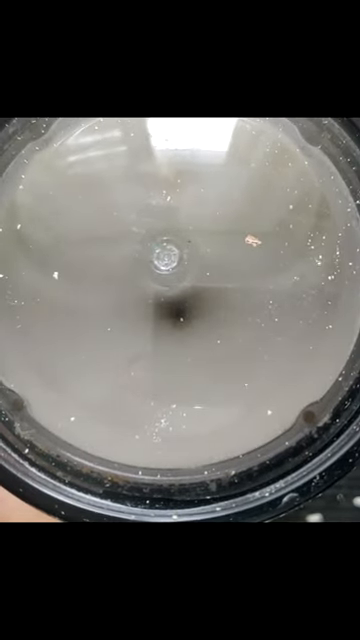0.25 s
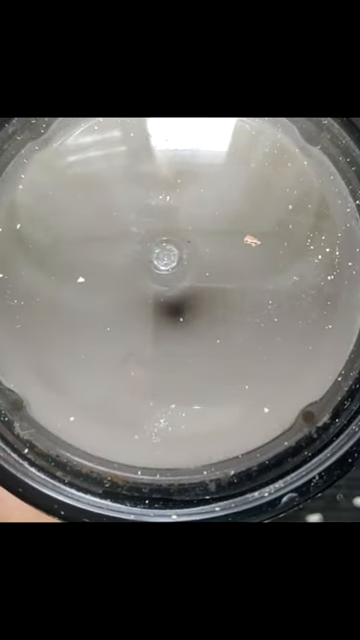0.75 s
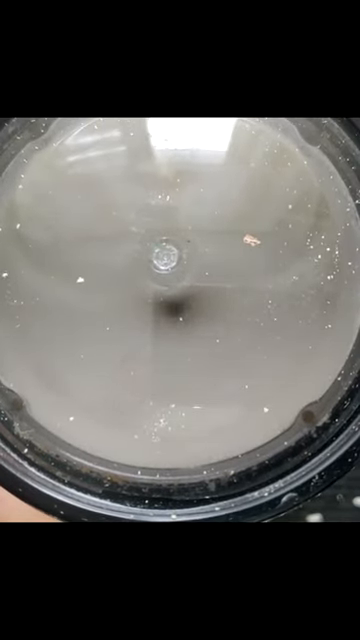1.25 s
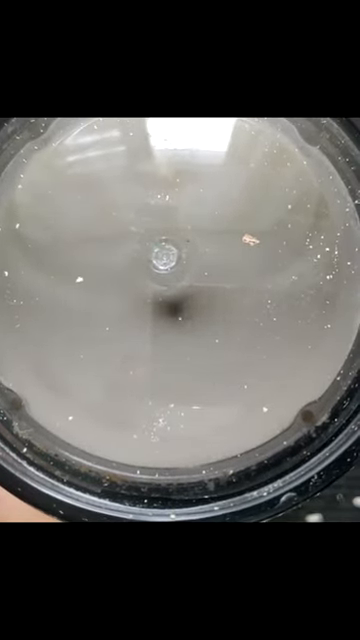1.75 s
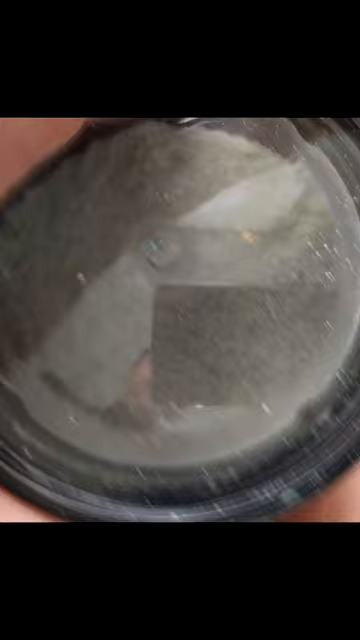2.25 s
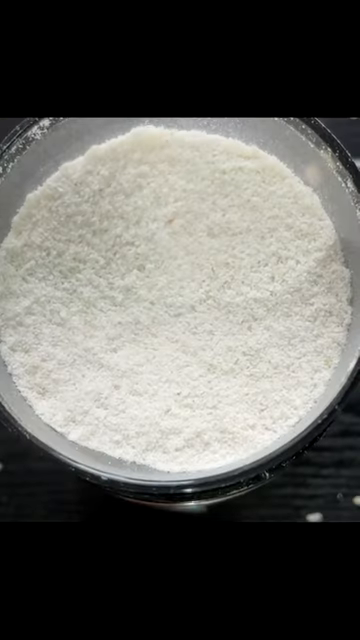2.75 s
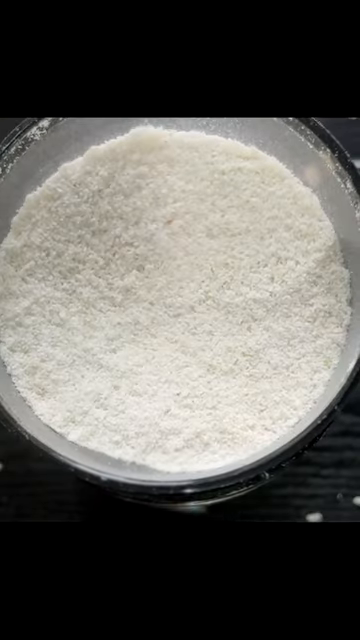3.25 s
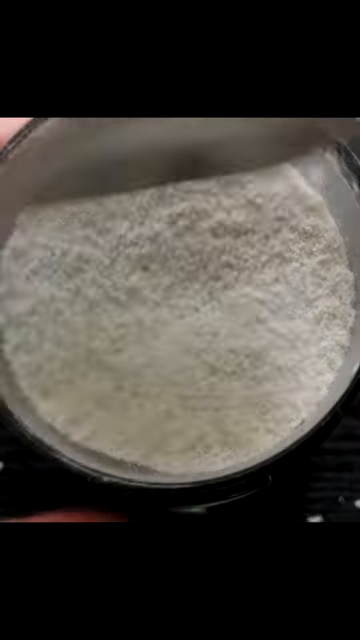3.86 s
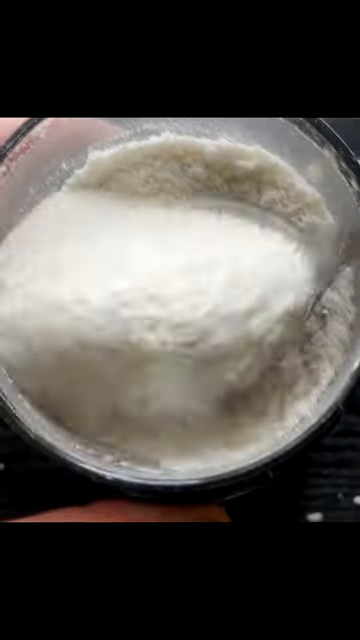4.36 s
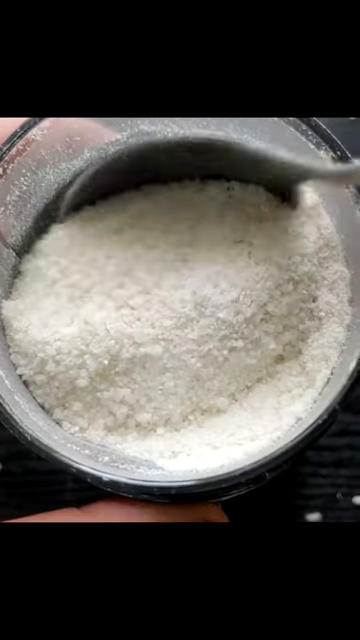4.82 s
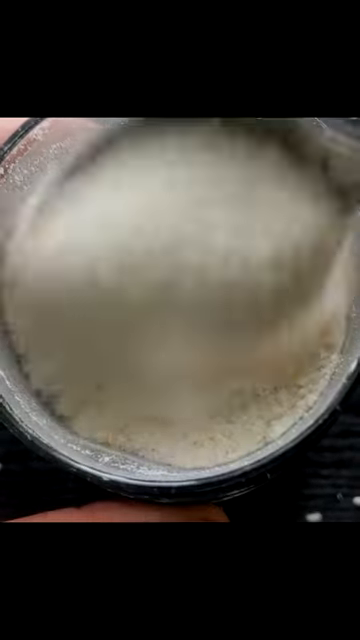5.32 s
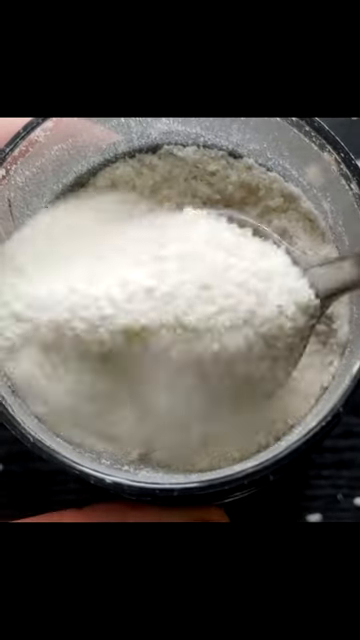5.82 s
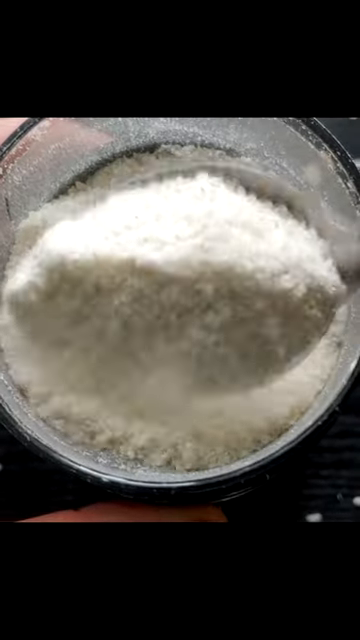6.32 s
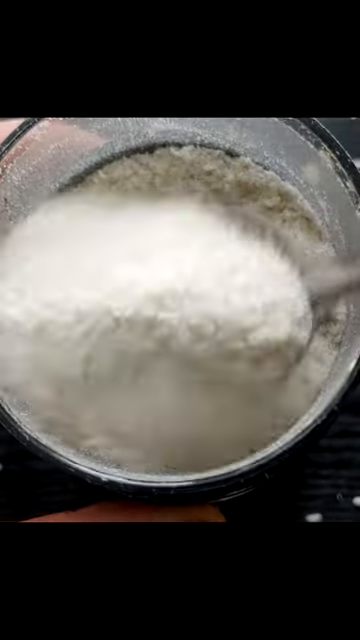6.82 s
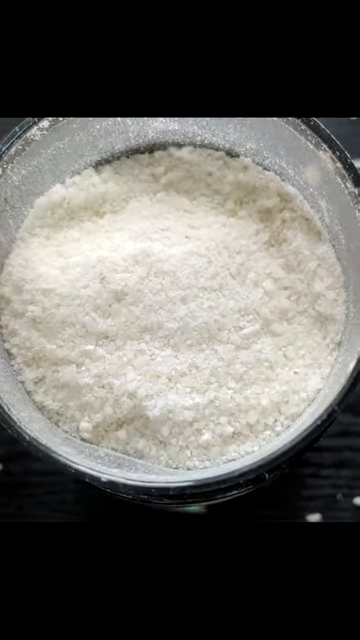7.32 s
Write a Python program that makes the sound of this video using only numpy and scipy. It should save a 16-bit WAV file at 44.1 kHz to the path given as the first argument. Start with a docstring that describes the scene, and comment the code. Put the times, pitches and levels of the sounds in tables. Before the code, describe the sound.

Close, harsh grinding of dry grain cuts out quickly, followed by plastic lid clicks, a counter bump and light spoon taps in powder.

```python
"""A small blade grinder whirls dry grain close by, then runs down after two seconds: shaft harmonics
over noise from dense grain impacts. Its plastic lid snaps off, lands and wobbles on the counter, and the
grinder is bumped down: short noise blows with decaying modes. A spoon taps, digs and scrapes in the flour:
blows and clumped slips through the cup's resonances. Fingers rub; behind is still room air and faint hum."""
import sys
import numpy as np
from scipy import signal
from scipy.fft import rfft, irfft
from scipy.io import wavfile

SR = 44100
rng = np.random.default_rng(int(sys.argv[2]) if len(sys.argv) > 2 else 0)


def put_to_file(sound):
    """Save the sound as 16-bit audio at rate SR, in the file named by the first command-line argument."""
    columns = np.atleast_2d(sound).T  # one column per channel
    safe = np.clip(columns, -1, 1)
    whole_steps = np.round(safe * 32767)
    wavfile.write(sys.argv[1], SR, whole_steps.astype(np.int16))


N = 334278
T = np.arange(N) / SR

# Room air spectrum, relative: freq_hz, density_db_per_hz
ROOM_SPECTRUM = [(15, -28.5), (48, -8), (80, -12), (115, -8.5), (160, -21), (205, -14), (300, -21.5),
                 (400, -24), (560, -17), (740, -24.5), (900, -21.5), (1130, -31.5), (1400, -26.5),
                 (2100, -43), (2600, -38.5), (4000, -48.5), (7500, -59.5), (9800, -48), (12500, -61.5),
                 (15000, -64)]
# Hum tones: freq_hz, level_db
HUM_TONES = [(120, -72.5), (202, -85)]
AIR_DB = -70
EDGE_HZ = 15800

# Shaft speed under load, before run-down: time_s, speed_turns_per_s
SHAFT_SPEED = [(0.0, 252.6), (0.12, 250.7), (0.2, 254.4), (0.3, 244.2), (0.34, 246.5), (0.44, 247.7),
               (0.49, 244.1), (0.59, 250.0), (0.64, 246.4), (0.83, 250.7), (0.94, 245.7), (1.1, 248.5),
               (1.32, 248.8), (1.37, 246.1), (1.48, 248.1), (1.83, 247.6), (1.88, 244.5), (2.04, 244.8)]
# Shaft harmonics 1, 2, 3.., before load and coarseness: level_db, pan_left_right_db, flutter_0_1
SHAFT_HARMONICS = [(-37.5, -11.5, 0.18), (-31, 1, 0.2), (-40.5, 2, 0.45), (-38.5, 9.5, 0.5),
                   (-27.5, 3.5, 0.4), (-42.5, 5.5, 0.2)]
# Grain on the cup wall, relative: freq_hz, density_db_per_hz
WALL_SPECTRUM = [(20, -38), (55, -26.5), (105, -17), (155, -27.5), (275, -10.5), (360, -5.5), (520, -6),
                 (880, -7.5), (1060, -7.5), (1380, 1), (1620, -3.5), (2050, -3.5), (2550, -9), (3350, -25),
                 (3950, -26), (4550, -38), (7000, -85.5)]
# Treble of the grain spray, relative: freq_hz, density_db_per_hz
SPRAY_SPECTRUM = [(3500, -30), (4600, -8), (5600, -8), (6300, -5), (6900, -11), (7350, -25), (7850, -9),
                  (8700, -4), (9600, 2), (10400, 0), (11900, -9), (12650, -24), (13300, -13), (15800, -13)]
# Cup and housing modes: freq_hz, width_hz, level_db
HOUSING_MODES = [(592.7, 23, -42.5), (658, 60, -42), (728, 72, -48), (868.5, 57, -42), (1301, 60, -44),
                 (1430, 74, -40.5), (1446.5, 17, -45), (1627, 35, -60), (1717, 12, -53.5), (1963, 43, -46),
                 (2112, 40, -42.5), (2175, 45, -44.5), (2537, 66, -45), (2680, 63, -60.5), (2860, 57, -56),
                 (2920, 60, -62), (3780, 210, -49.5), (5460, 430, -66.5), (6280, 410, -70)]
# Grinding balance: freq_hz, pan_left_right_db
GRINDING_PAN = [(60, -1), (200, -2), (400, 3.5), (900, 5), (1400, 0.5), (2400, 9.5), (3200, 4), (3900, -5),
                (5400, 1), (6300, 5), (8000, 0), (15000, -2)]
# Grinding likeness of left and right: freq_hz, likeness_0_1
GRINDING_LIKENESS = [(100, .85), (600, .75), (1400, .7), (2300, .3), (3200, 0), (15000, 0)]
# The power is cut; the settling flour brakes the blade ever harder
OFF_S, RUN_DOWN_S, BRAKING_POWER = 2.0348, 0.157, 3.36
GRIND_POWER, TONE_POWER = 7, 36  # gain exponents on the speed share
COARSE_DB, COARSE_S = -7, 0.33  # tone starts weak, rises as the grain gets finer; time constant
TONE_DB_PER_TURN_PER_S = 0.51  # tone weakens when load drags the speed down

# Lid catches let go: start_s, level_db, tilt_db_per_octave, rattle_t60_s, pan_left_right_db
CATCH_CLICKS = [(2.356, -53, -2, 0.06, 3), (2.366, -47.5, 0.5, 0.08, 13), (2.3803, -27, 1, 0.014, 10),
                (2.392, -39, -0.5, 0.073, 2), (2.446, -48.5, -9, 0.19, 2), (2.478, -62, 3.5, 0.032, -1)]
# Catch colour, relative: freq_hz, density_db_per_hz
CATCH_SPECTRUM = [(60, -39), (120, -8), (550, 7), (900, 1), (1250, 0), (1500, 6.5), (2050, 2), (2400, -13),
                  (2700, -4), (3200, -23), (3800, -16.5), (5800, -25), (8000, -22), (11000, -31),
                  (15000, -58)]
# Lid edges land on the counter: start_s, level_db, bounce_gap_s, rattle_t60_s
LANDINGS = [(2.7067, -26.5, .0095, 0.09), (2.837, -34.5, .014, 0.077)]
LID_TOUCH_DB, BOUNCE_LOSS_DB = -10, 4  # graze before landing; loss per bounce
# Lid colour, relative: freq_hz, density_db_per_hz
LID_SPECTRUM = [(47, -54), (80, -16.5), (333, -4), (394, -5), (465, -10), (624, -3.5), (892, -8.5),
                (970, 5.5), (1050, -15.5), (1270, -11), (1380, -22.5), (2650, -40), (4570, -60.5),
                (12000, -73), (15600, -103), (22000, -120)]
# Lid ring after each blow: freq_hz, level_re_blow_db, t60_s
LID_RING_MODES = [(970, -26, .15), (2650, -31, 0.096)]
# Lid rim rolls to rest: start_s, length_s, level_db, pitch_hz
RIM_WOBBLES = [(2.816, 0.077, -40.5, 918), (2.885, 0.047, -51.5, 280), (3.055, 0.053, -55.5, 243)]

# Grinder meets the counter: start_s, level_db, tilt_db_per_octave, rattle_t60_s, pan_left_right_db
COUNTER_BUMPS = [(3.5555, -41, 2.5, 0.08, -3.5), (3.5667, -22, 2.24, 0.0089, -8),
                 (3.5712, -33, -1.5, 0.015, -4), (3.579, -46, 1, .03, -1.5)]
# Counter colour, relative: freq_hz, density_db_per_hz
COUNTER_SPECTRUM = [(50, -11), (110, -4.5), (280, 4), (400, -6), (520, 2), (720, 3.5), (930, -13.5),
                    (1150, 0.5), (1500, -7), (2200, -9), (2900, -23), (5800, -38.5), (13000, -53),
                    (15000, -65)]
# Grinder base ring: freq_hz, level_re_blow_db, t60_s
BASE_RING_MODES = [(260, -5, 0.049), (529, -1, .045), (704, 0.5, .04), (1123, -5.5, 0.033),
                   (2670, -39.5, 0.12)]
# Hand or spoon leans on the grinder: start_s, level_db
LEANS = [(2.446, -51), (5.7, -49.5), (5.758, -52), (7.297, -54)]
BOUNCE_HZ, BOUNCE_T60_S, TILT_HZ, TILT_T60_S = 57, 0.22, 105, 0.11  # grinder on its rubber feet

# Cup's broad response, relative: freq_hz, density_db_per_hz
CUP_SPECTRUM = [(60, -3), (200, -8.5), (350, -3.5), (800, -4.5), (1100, -8.5), (1800, -11), (2250, -22),
                (3600, -34), (5200, -39.5), (7500, -49), (9700, -30), (12000, -53), (15000, -44)]
# Cup modes: freq_hz, width_hz, lift_db
CUP_RING_MODES = [(359, 26, 9), (653, 90, 8), (937, 24, 4.5), (1495, 98, 7), (3640, 67, 12.5),
                  (4400, 44, -13)]
# Spoon on cup: start_s, level_db, tilt_db_per_octave, rattle_t60_s, focus_hz, metal_ring_db
TAPS = [(3.29, -66, -1.5, 0.037, 600, -76), (3.933, -57, -1.5, 0.044, 1550, -65),
        (4.214, -64.5, -1.5, 0.055, 1550, -74), (4.348, -54.5, 1, 0.092, 830, -59),
        (4.645, -49.5, -8.5, 0.064, 380, -66), (4.712, -54, -0.5, 0.11, 910, -66),
        (4.734, -48.5, -2, 0.025, 1390, -70), (5.007, -52.5, -2, 0.094, 710, -70),
        (5.02, -50.5, 1, 0.12, 816, -63), (5.165, -58, -5, 0.1, 1450, -58),
        (5.522, -59, 0, 0.034, 363, -68), (5.6101, -41, -1, 0.013, 470, -48),
        (5.625, -47, -0.5, 0.11, 600, -57), (5.727, -55.5, -0.5, 0.064, 627, -66),
        (5.805, -58, 0.5, .08, 640, -74), (6.56, -57, -1.5, 0.042, 352, -69),
        (6.626, -57, -1.5, 0.028, 368, -70.5), (6.652, -50.5, -3.5, 0.048, 560, -61.5),
        (6.823, -56, -4, 0.085, 417, -67), (7.057, -61.5, -5.5, 0.097, 250, -76),
        (7.2891, -48, 0, 0.045, 343, -44)]
# Spoon metal: freq_hz, level_re_ring_db, t60_s
METAL_MODES = [(1495, -9, 0.078), (2350, -13.5, 0.025), (3530, -35, 0.075), (4430, -43, .1)]
HEAVY_TAP_DB = 1.2  # extra rocking per dB/octave of dullness: a dull touch is a heavy push
# Spoon scoops flour: start_s, length_s, dig_db, dig_tilt_db_per_octave, drag_db, lift_db
FLOUR_SCOOPS = [(4.123, .16, -69, 2.5, -80, -76), (4.637, .14, -60, 4, -65, -73),
                (4.999, 0.233, -56.5, -1, -58.5, -63.5), (5.598, 0.274, -51, 0.5, -67.5, -62.5),
                (6.641, 0.25, -60, -2.5, -68, -71)]
DIG_S, LIFT_S = 0.061, 0.071
DIG_HZ, DRAG_HZ, LIFT_HZ = 3080, 1400, 1150  # focus as the spoon moves round the cup
DRAG_TILT_DB_PER_OCTAVE, LIFT_TILT_DB_PER_OCTAVE = -1.5, 2.5
SING_HZ, SING_WIDTH_HZ = 4440, 52  # mode that scraping keeps sounding
# Fingers slide on lid and cup: start_s, length_s, level_db, tilt_db_per_octave, focus_hz
FINGER_RUBS = [(2.12, 0.41, -62.5, -0.5, 3000), (2.387, .14, -57.5, 2, 3700), (2.49, 0.28, -65, 0.5, 2800),
               (2.752, 0.058, -56, 0, 9000), (2.803, 0.1, -53, 1.5, 2650), (3.715, 0.22, -71, -3.5, 3000),
               (4.465, 0.24, -71.5, -3, 1580)]


def amp(db):
    """Decibels to gain."""
    return 10 ** (np.asarray(db) / 20)


def unit(x):
    """Scales to rms 1."""
    return x / np.sqrt(np.mean(abs(x) ** 2) + 1e-20)


def curve(rows):
    """A control curve at every sample."""
    return np.interp(T, *np.transpose(rows))


def read(points, hz):
    """Reads a spectrum table on a log-frequency axis."""
    f, value = np.transpose(points)
    return np.interp(np.log(hz + 1), np.log(f + 1), value)


def sides(db):
    """Left and right gains for a level difference."""
    return amp(np.array([[0.5], [-0.5]]) * db)


def add(mix, start_s, sound):
    """Lays a stereo sound into the mix at start_s."""
    part = mix[:, round(start_s * SR):][:, :sound.shape[1]]
    part += sound[:, :part.shape[1]]


def wander(rate_hz):
    """Slow random signal of rms 1."""
    hz = np.fft.rfftfreq(N, 1 / SR)
    spectrum = rfft(rng.standard_normal(N))
    return unit(irfft(spectrum / (1 + (hz / rate_hz) ** 2), N))


def colour(x, spectrum, tilt_db=0, size=4096):
    """Minimum-phase filter with this spectrum, tilted in dB per octave about 1 kHz."""
    hz = abs(np.fft.fftfreq(size, 1 / SR))
    octaves = np.log2(np.clip(hz, 150, 8000) / 1000)
    log_gain = np.log(amp(read(spectrum, hz) + tilt_db * octaves) + 1e-6)
    response = np.exp(signal.hilbert(log_gain).conj())
    impulse = np.fft.ifft(response).real[:size // 2]
    return signal.oaconvolve(x, impulse[None], axes=1)[:, :x.shape[1]]


def grains(count, per_s, spread_db):
    """Two unrelated trains of tiny impacts of uneven size."""
    hit = rng.random((2, count)) < per_s / SR
    strength = rng.standard_normal((2, count))
    size = np.minimum(rng.exponential(1, (2, count)), 4)
    return unit(hit * strength * amp(spread_db * size))


def pair(x, same):
    """Makes two unrelated channels partly alike."""
    same = np.clip(same, -1, 1)
    return np.array([x[0], same * x[0] + np.sqrt(1 - same ** 2) * x[1]])


def stroke(length_s):
    """A swell that rises quickly and eases off."""
    return np.sin(np.pi * np.linspace(0, 1, round(length_s * SR)) ** 0.59).clip(0)


def ringing(hz, t60_s):
    """One struck mode dying away exponentially."""
    t = np.arange(SR // 2) / SR
    return np.sin(2 * np.pi * hz * t) * np.exp(-np.log(1000) * t / t60_s)


def struck(blows, modes, pan_db):
    """Every blow (start_s, level_db, ..) rings the same modes in proportion to its strength."""
    out = np.zeros((2, N))
    ring = sides(pan_db) * sum(amp(db) * ringing(hz, t60_s) for hz, db, t60_s in modes)
    for start_s, db, *_ in blows:
        add(out, start_s, amp(db) * ring)
    return out


def knocks(rows, spectrum, rattle, same, rise_s=0.0012):
    """Each blow is one sharp push and a short dense rattle, coloured by the thing struck."""
    out = np.zeros((2, N))
    t = np.arange(SR // 5) / SR
    for start_s, db, tilt_db, t60_s, pan_db in rows:
        push = pair(rng.standard_normal((2, len(t))), same) * amp(-60 * t / t60_s)
        push *= 1 - np.exp(-t / rise_s)  # the blow spreads through the shell
        push *= rattle / np.linalg.norm(push[0])
        push[:, 0] += 1
        blow = colour(push, spectrum, tilt_db)
        blow /= np.sqrt(np.sum(blow ** 2) / (2 * SR / 100))  # energy referred to 10 ms
        add(out, start_s, amp(db) * sides(pan_db) * blow)
    return out


def background(hum_drift_rad=0.33):
    """Coloured noise for still room air, phase-drifting sines for an appliance's hum."""
    air = unit(colour(pair(rng.standard_normal((2, N)), same=0.36), ROOM_SPECTRUM))
    hum = 0
    for hz, db in HUM_TONES:
        phase = 2 * np.pi * hz * T + hum_drift_rad * wander(rate_hz=3)
        hum = hum + np.sqrt(2) * amp(db) * np.sin(phase)
    return amp(AIR_DB) * air + hum


def kitchen(x, wet_db=-28, t60_s=0.051):
    """Faint dull reflections from walls and worktop: decaying low-passed noise after 4 ms."""
    t = np.arange(SR // 2) / SR
    tail = rng.standard_normal((2, len(t))) * np.exp(-np.log(1000) * t / t60_s) * (t > 0.004)
    tail = signal.lfilter(*signal.butter(1, 4000, fs=SR), tail)
    tail /= np.linalg.norm(tail[0])
    return x + amp(wet_db) * signal.fftconvolve(x, tail, axes=1)[:, :N]


def ports(x, lag_s=0.00006, shadow_hz=2500):
    """Long waves reach the right microphone port a little after the left; the lag fades in the treble."""
    hz = np.fft.rfftfreq(N, 1 / SR)
    delay_s = lag_s / (1 + (hz / shadow_hz) ** 4)
    return np.array([x[0], irfft(rfft(x[1]) * np.exp(-2j * np.pi * hz * delay_s), N)])


def rocking(blows, bounce_db, tilt_db):
    """The heavy motor bounces and tilts on its feet after each push."""
    modes = [(BOUNCE_HZ, bounce_db, BOUNCE_T60_S), (TILT_HZ, tilt_db, TILT_T60_S)]
    return struck(blows, modes, pan_db=-8)


def cup(focus_hz, focus_db=8, width_octaves=0.31):
    """The cup's spectrum with its modes, lifted round the pitch that the touched spot favours."""
    hz = np.geomspace(40, 16000, 900)
    modes_db = sum(db / (1 + (2 * (hz - f) / width_hz) ** 2) for f, width_hz, db in CUP_RING_MODES)
    lift_db = focus_db * np.exp(-0.5 * (np.log2(hz / focus_hz) / width_octaves) ** 2)
    return np.column_stack([hz, read(CUP_SPECTRUM, hz) + modes_db + lift_db])


def slipping(moves, per_s, spread_db, clump_db):
    """Strokes made of clumps of fine slips that sound through the cup."""
    slips = pair(grains(N, per_s, spread_db), same=0.23) * amp(clump_db * wander(rate_hz=49))
    out = np.zeros((2, N))
    for start_s, length_s, db, tilt_db, focus_hz in moves:
        swell = stroke(length_s)
        part = slips[:, round(start_s * SR):][:, :len(swell)]
        crunch = unit(colour(part, cup(focus_hz), tilt_db))
        add(out, start_s, amp(db) * swell * crunch)
    return out * sides(db=3.5)


def fingers():
    """Skin slides smoothly on the plastic: dense, even slips."""
    return slipping(FINGER_RUBS, per_s=5900, spread_db=0.5, clump_db=1.0)


def scooping(sing_db=15):
    """Each scoop is a dig, a drag and a lift through crunching flour; the slips make the spoon sing."""
    moves = []
    for start_s, length_s, dig_db, dig_tilt_db, drag_db, lift_db in FLOUR_SCOOPS:
        lift_start_s = start_s + length_s - LIFT_S
        moves += [(start_s, DIG_S, dig_db, dig_tilt_db, DIG_HZ),
                  (start_s, length_s, drag_db, DRAG_TILT_DB_PER_OCTAVE, DRAG_HZ),
                  (lift_start_s, LIFT_S, lift_db, LIFT_TILT_DB_PER_OCTAVE, LIFT_HZ)]
    crunch = slipping(moves, per_s=1500, spread_db=1.0, clump_db=2.0)
    singing = signal.lfilter(*signal.iirpeak(SING_HZ, SING_HZ / SING_WIDTH_HZ, SR), crunch)
    return crunch + amp(sing_db) * singing


def spoon(rattle=3.2, chatter=0.64, pan_db=4):
    """Flour-cushioned touches ring the cup by the spot touched, make the metal chatter and rock the grinder."""
    taps = np.zeros((2, N))
    for start_s, db, tilt_db, t60_s, focus_hz, _ in TAPS:
        row = (start_s, db, tilt_db, t60_s, pan_db)
        taps += knocks([row], cup(focus_hz), rattle, same=0.56, rise_s=0.0018)
    rings = [(start_s, ring_db) for start_s, *_, ring_db in TAPS]
    metal = struck(rings, METAL_MODES, pan_db=5) * (1 + chatter * wander(rate_hz=160))
    pushes = [(start_s, db - HEAVY_TAP_DB * tilt_db) for start_s, db, tilt_db, *_ in TAPS]
    return taps + metal + rocking(pushes, bounce_db=-15, tilt_db=-10)


def counter_bump():
    """Blows on the counter ring the grinder's base and rock it on its feet."""
    blows = knocks(COUNTER_BUMPS, COUNTER_SPECTRUM, rattle=1.138, same=0.22)
    base = struck(COUNTER_BUMPS, BASE_RING_MODES, pan_db=-5)
    return blows + base + rocking(COUNTER_BUMPS, bounce_db=-9, tilt_db=-7.5)


def wobbles(rough=0.38):
    """The lid rings unevenly as its rim rolls on the counter: roughened sines in short swells."""
    out = np.zeros((2, N))
    for start_s, length_s, db, hz in RIM_WOBBLES:
        swell = stroke(length_s)
        level = 1 + rough * wander(rate_hz=270)
        ring = unit(level * np.sin(2 * np.pi * hz * T + rough * wander(rate_hz=60)))
        add(out, start_s, amp(db) * sides(db=3.5) * swell * ring[:len(swell)])
    return out


def lid_landing(tilt_db=-0.3, pan_db=3, count=4):
    """Each edge of the lid grazes the counter, lands and bounces with falling strength, then the rim rolls."""
    blows = []
    for start_s, db, gap_s, t60_s in LANDINGS:
        blows.append((start_s - gap_s, db + LID_TOUCH_DB, tilt_db, t60_s, pan_db))
        for k in range(count):
            blows.append((start_s + k * gap_s, db - k * BOUNCE_LOSS_DB, tilt_db, t60_s, pan_db))
    impacts = knocks(blows, LID_SPECTRUM, rattle=2.3, same=0.53)
    return impacts + struck(blows, LID_RING_MODES, pan_db) + wobbles()


def lid_clicks():
    """The catches snap as sharp blows and rock the grinder."""
    snaps = knocks(CATCH_CLICKS, CATCH_SPECTRUM, rattle=1.0, same=1.0)
    return snaps + rocking(CATCH_CLICKS, bounce_db=-25, tilt_db=-20)


def run_down():
    """Share of its speed that the blade keeps: 1 until the power is cut, then falling to rest."""
    return 1 - np.clip((T - OFF_S) / RUN_DOWN_S, 0, 1) ** BRAKING_POWER


def closed_cup(sound, echo=0.54, echo_s=0.0068):
    """Treble bouncing round the closed cup combs the spectrum finely."""
    t = np.arange(SR // 20) / SR
    bounces = rng.standard_normal(len(t)) * np.exp(-t / echo_s)
    high_pass = signal.butter(4, 2000, "high", fs=SR, output="sos")
    bounces = signal.sosfilt(high_pass, bounces / np.linalg.norm(bounces))
    return sound + echo * signal.oaconvolve(sound, bounces[None], axes=1)[:, :N]


def grinding(wall_db=-26.0, spray_db=-51.5, throb=0.12, surge_db=0.42, surge_hz=24):
    """Thousands of grains a second strike blade and wall, a little more strongly once in each turn."""
    angle = 2 * np.pi * np.cumsum(curve(SHAFT_SPEED) * run_down()) / SR
    flow = (1 + throb * np.cos(angle)) * amp(surge_db * wander(surge_hz))
    wall = unit(colour(flow * grains(N, per_s=14000, spread_db=2.5), WALL_SPECTRUM))
    spray = unit(colour(flow * grains(N, per_s=31000, spread_db=4.5), SPRAY_SPECTRUM))
    sound = closed_cup(amp(wall_db) * wall + amp(spray_db) * spray)
    strikes = flow * grains(N, per_s=6000, spread_db=0.5)
    for mode_hz, width_hz, db in HOUSING_MODES:
        mode = signal.iirpeak(mode_hz, mode_hz / width_hz, SR)
        ring = signal.lfilter(*mode, signal.lfilter(*mode, strikes))
        sound += amp(db) * unit(ring)
    hz = np.fft.rfftfreq(N, 1 / SR)
    stereo = pair(rfft(sound), read(GRINDING_LIKENESS, hz)) * sides(read(GRINDING_PAN, hz))
    return irfft(stereo, N) * run_down() ** GRIND_POWER


def motor(lead_rad=0.55, flutter_hz=14, jitter=0.002):
    """The unbalanced blade shakes the housing at multiples of its speed; grain drags on it unevenly."""
    driven = curve(SHAFT_SPEED)
    speed = driven * run_down() * (1 + jitter * wander(rate_hz=25))
    angle = 2 * np.pi * np.cumsum(speed) / SR
    out = np.zeros((2, N))
    for k, (db, pan_db, flutter) in enumerate(SHAFT_HARMONICS, 1):
        drift = (wander(flutter_hz) + 1j * wander(flutter_hz)) / np.sqrt(2)
        swing = unit(1 + flutter * drift)  # level and phase flutter
        wave = swing * np.exp(1j * (k * angle + 2 * np.pi * rng.random()))
        stereo = np.real([wave, wave * np.exp(-1j * lead_rad)])
        out += np.sqrt(2) * amp(db) * sides(pan_db) * stereo
    load_db = TONE_DB_PER_TURN_PER_S * (driven - driven[T < OFF_S].mean())
    tone_db = COARSE_DB * np.exp(-T / COARSE_S) + load_db
    return out * amp(tone_db) * run_down() ** TONE_POWER


def scene():
    """Grinding, then the lid, the bump and the spoon."""
    handling = fingers() + rocking(LEANS, bounce_db=1, tilt_db=-15)
    lid = lid_clicks() + lid_landing()
    near = handling + scooping() + spoon() + lid + grinding() + motor()
    return background() + kitchen(ports(near) + counter_bump())  # the bump has no port lag


def record(dry):
    """The loudest peaks are flattened; then the band limit."""
    flattened = dry / (1 + (dry / 0.42) ** 8) ** (1 / 8)
    low_pass = signal.firwin(511, EDGE_HZ, window=("kaiser", 9), fs=SR)
    return signal.oaconvolve(flattened, low_pass[None], "same")


dry = scene()
out = record(dry)
put_to_file(out)
```